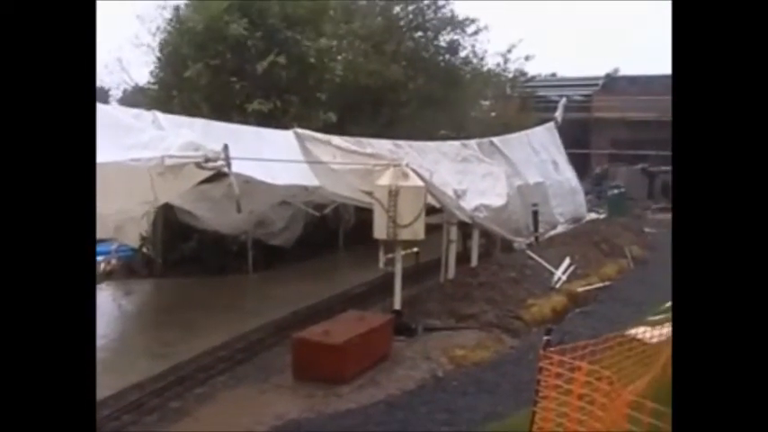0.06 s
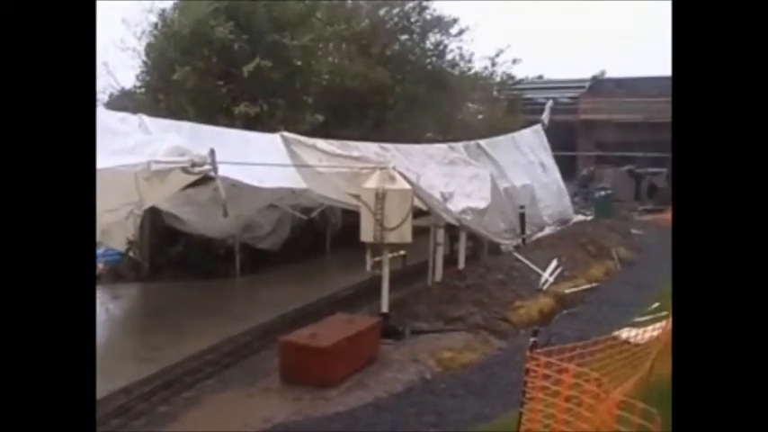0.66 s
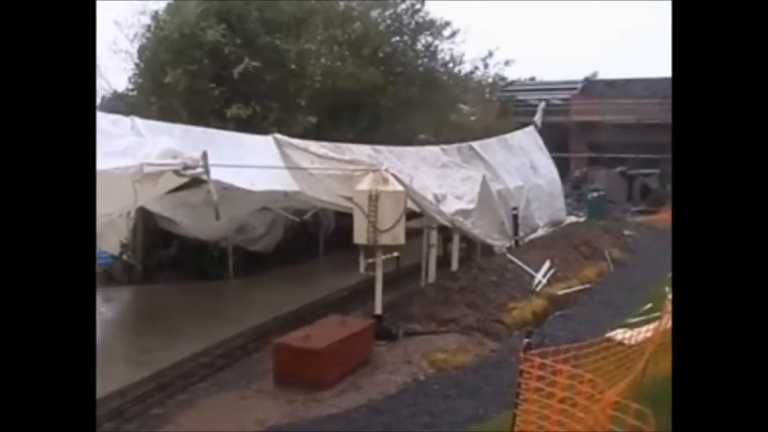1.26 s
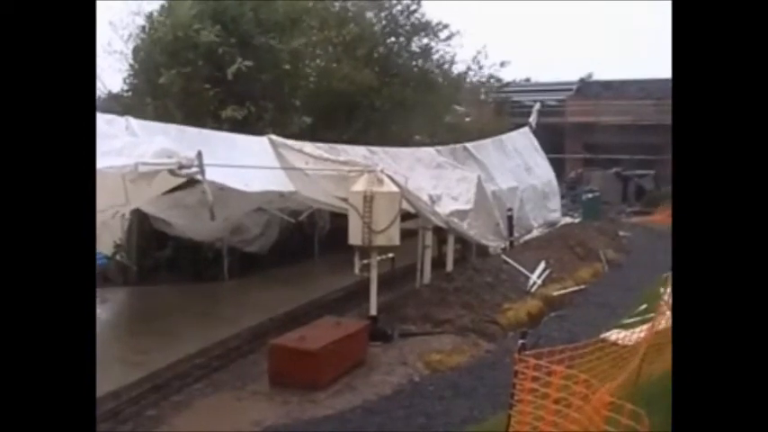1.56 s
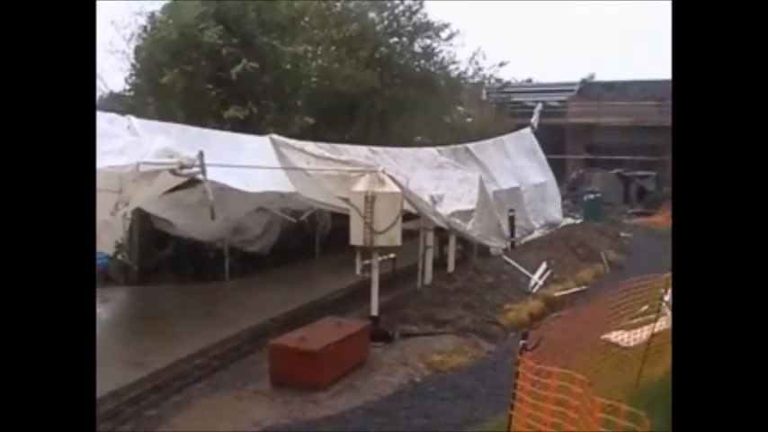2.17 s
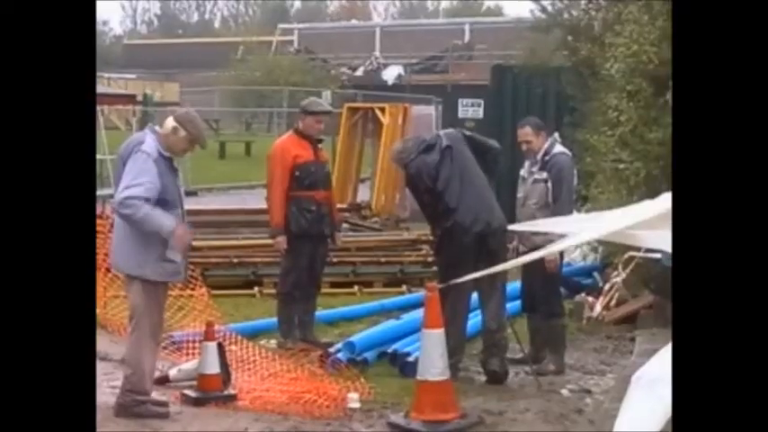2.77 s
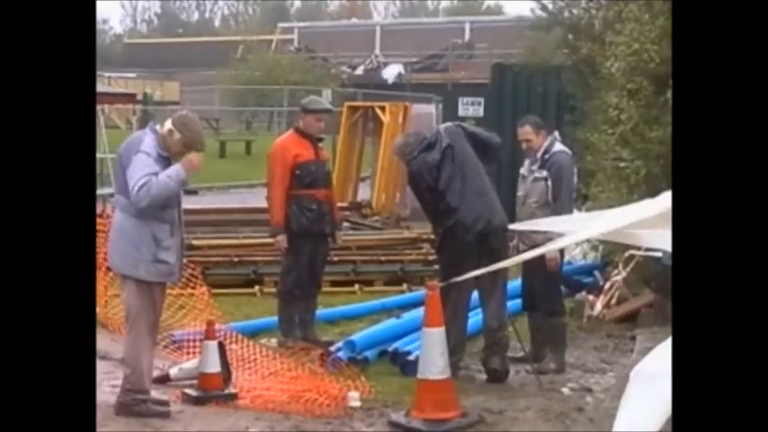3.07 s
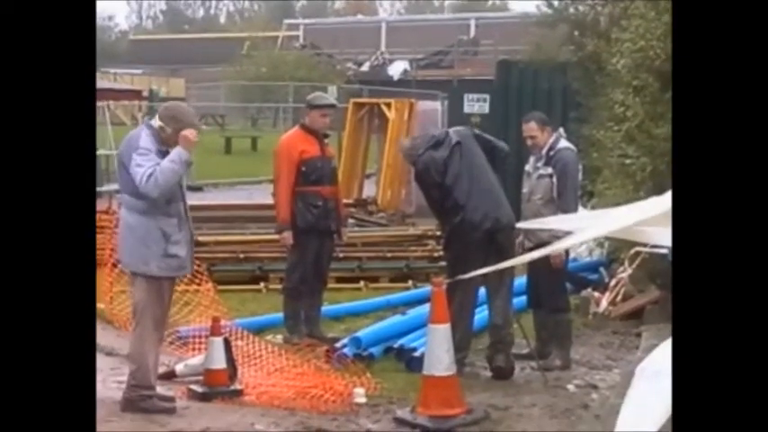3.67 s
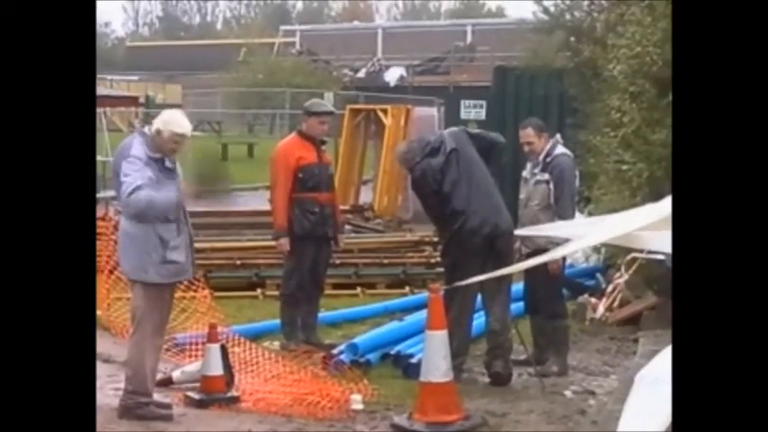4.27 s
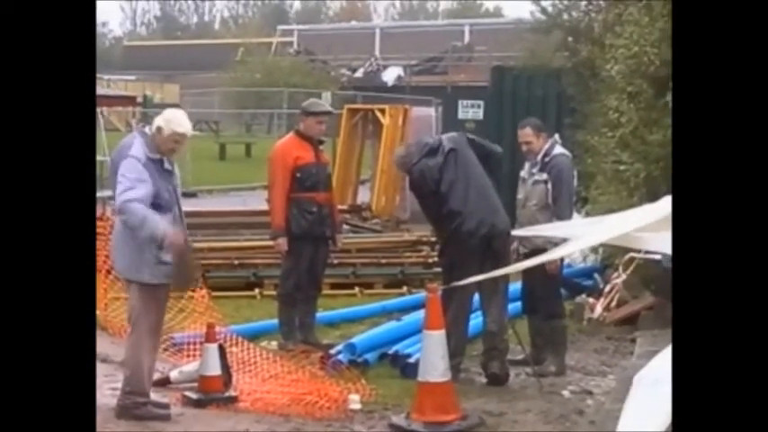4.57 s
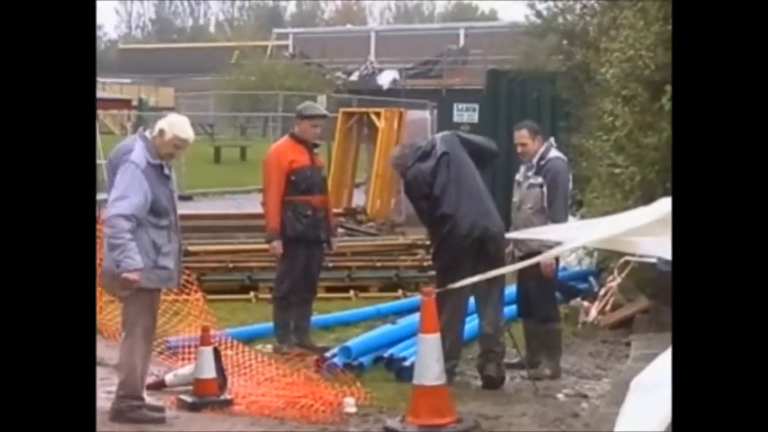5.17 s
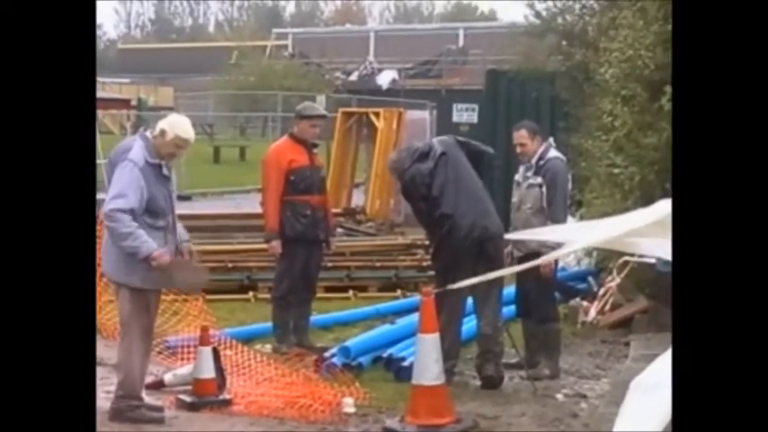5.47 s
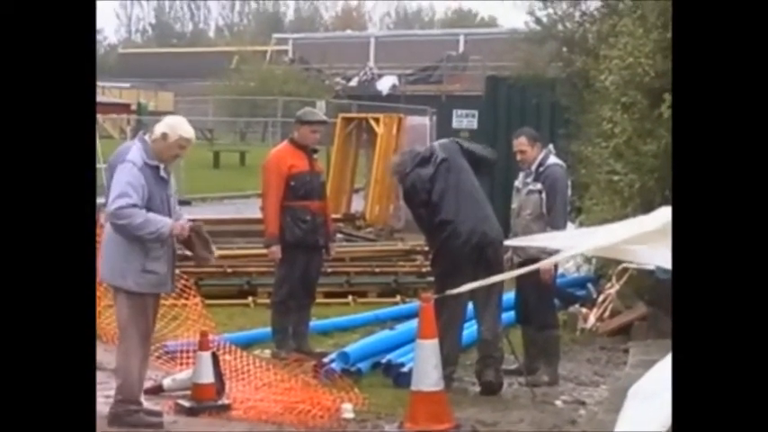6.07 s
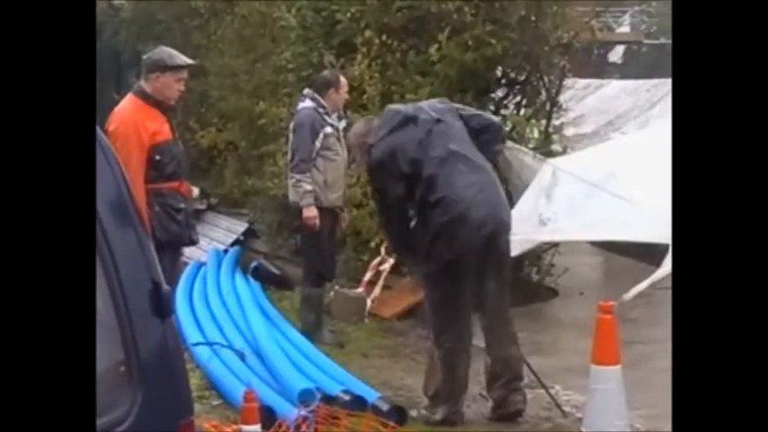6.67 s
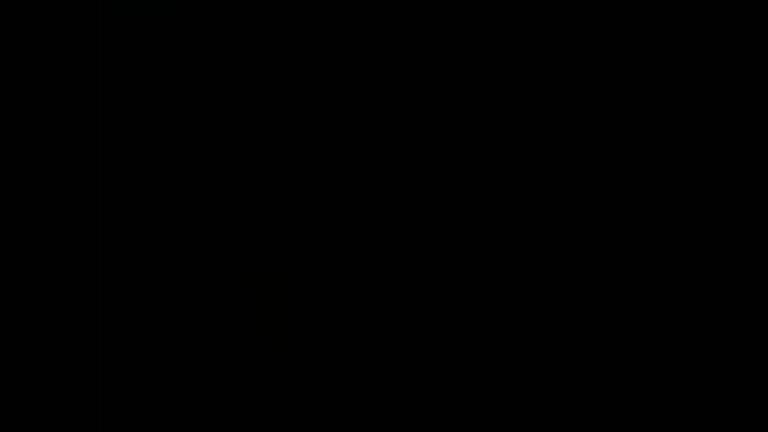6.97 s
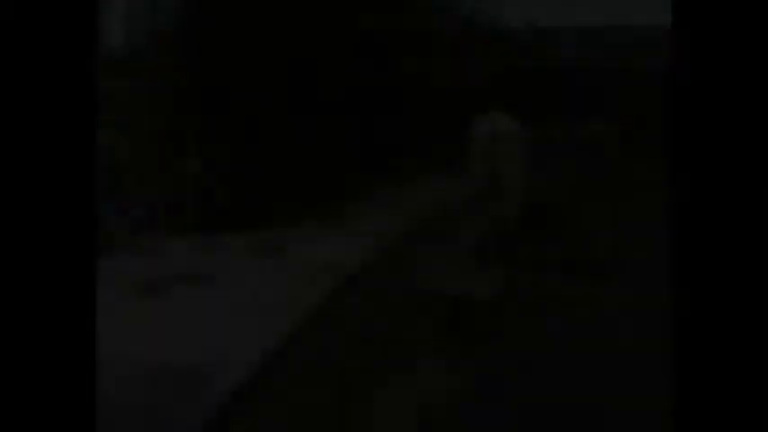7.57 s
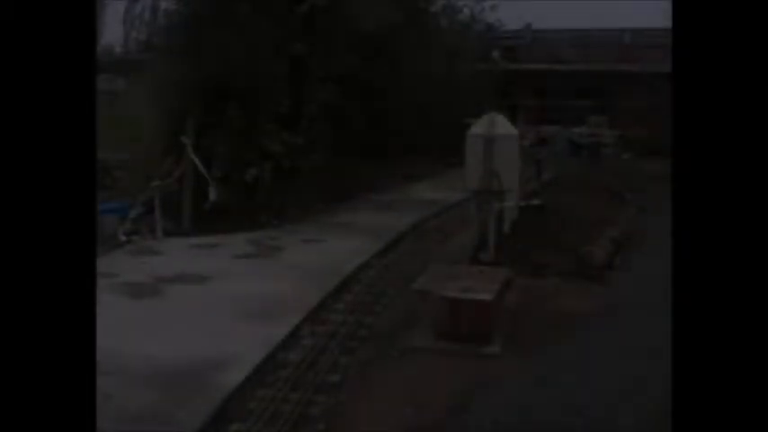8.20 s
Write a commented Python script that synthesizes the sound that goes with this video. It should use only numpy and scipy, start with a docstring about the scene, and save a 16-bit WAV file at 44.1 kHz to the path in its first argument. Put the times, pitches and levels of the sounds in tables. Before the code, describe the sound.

A hammer strikes a steel stake outdoors in steady, ringing clanks over a rush of wind and far traffic.

```python
"""Hammering a steel stake

Wind in trees and far traffic rush behind an idling engine. A cut leads into hammering on a building site: each
impact cracks, excites the modes of hammer and stake, which wet soil damps, and echoes off buildings, while the
camera's gain control ducks. Small knocks sound around the site, and one loud, bright echo follows the last
blow, heard from beside bushes. Then a quiet yard fades in, with a bird."""
import sys
import numpy as np
from scipy import signal
from scipy.fft import rfft, irfft, next_fast_len
from scipy.io import wavfile
from scipy.ndimage import uniform_filter1d, minimum_filter1d

SR = 44100
rng = np.random.default_rng(int(sys.argv[2]) if len(sys.argv) > 2 else 0)


def master(y):
    """Save y as 16-bit WAV."""
    cut = np.clip(np.atleast_2d(y).T, -1, 1)
    pcm = np.round(cut * 32767)  # scale
    wavfile.write(sys.argv[1], SR, pcm.astype(np.int16))


N = 372204
TIME = np.arange(N) / SR
WORK_START_S, BUSHES_START_S, YARD_START_S = 2.49, 6.132, 6.93


def from_db(db):
    """Decibels to amplitude ratio."""
    return 10 ** (np.asarray(db) / 20)


def rms_one(x):
    """Normalisation to rms 1."""
    return x / np.sqrt(np.mean(x ** 2) + 1e-20)


def butter(x, hz, kind):
    """Second-order Butterworth low- or high-pass."""
    return signal.sosfilt(signal.butter(2, hz, kind, fs=SR, output="sos"), x)


def noise(spectrum, size):
    """Spectral shaping of white noise by (frequency_hz, level_db) points; rms 1."""
    hz, db = np.transpose(spectrum)
    gain = from_db(np.interp(np.log(np.fft.rfftfreq(size, 1 / SR) + 1), np.log(hz), db))
    return rms_one(irfft(rfft(rng.standard_normal(size)) * gain, size))


def drift(rate_hz, t=TIME):
    """Random modulation with a spread of about 1."""
    return np.interp(t * rate_hz, np.arange(400), rng.standard_normal(400))


def decay(t, t60_s):
    """Exponential damping: 60 dB down at t60_s."""
    return np.exp(-np.log(1000) * t / t60_s)


def add(track, start_s, sound):
    """Superposition of a sound on the track."""
    start = round(start_s * SR)
    track[start:start + len(sound)] += sound[:N - start]


# Background spectrum at each listening place: frequency_hz, relative_density_db
TENT_SPECTRUM = [(15, -45), (25, -20), (39, -17), (70, -4), (145, -7), (229, -3), (293, -6), (591, -3),
                 (641, -2), (887, -5.5), (1370, -7), (2410, -14.5), (4490, -19.5), (12500, -33.5),
                 (16000, -45)]
WORK_SPECTRUM = [(15, -34.5), (25, -8.5), (249, -3), (384, -4.5), (489, -2), (591, -3.5), (677, 1),
                 (887, -2), (1330, -3.5), (2350, -12.5), (4490, -16), (8140, -28.5), (11000, -31.5),
                 (16000, -37)]
BUSHES_SPECTRUM = [(15, -58.5), (25, -18), (87, -1), (145, -10), (270, -7), (591, -9.5), (677, -4.5),
                   (1190, -8.5), (1330, -8), (2350, -17), (4610, -20.5), (14000, -38.5), (16000, -44)]
YARD_SPECTRUM = [(15, -46), (25, -14), (102, -4.5), (141, -11), (175, -6.5), (344, -10.5), (373, -7),
                 (607, -7), (936, -6.5), (2910, -24.5), (7310, -29), (16000, -43)]

def wind_and_traffic(tent_db=-35, work_db=-33, bushes_db=-31, dip_db=10, dip_s=0.12, fade_db_per_s=16.5):
    """Broadband noise of wind in trees and far traffic; each place has its own spectrum and level."""
    place = np.searchsorted([WORK_START_S, BUSHES_START_S, YARD_START_S], TIME)
    spectra = (TENT_SPECTRUM, WORK_SPECTRUM, BUSHES_SPECTRUM, YARD_SPECTRUM)
    rush = np.choose(place, [noise(spectrum, next_fast_len(N))[:N] for spectrum in spectra])
    dip = np.clip(1 - (TIME - WORK_START_S) / dip_s, 0, 1)
    yard_db = -73.5 + fade_db_per_s * (TIME - YARD_START_S)
    level_db = np.choose(place, [tent_db, work_db - dip_db * dip, bushes_db, yard_db])
    return butter(rush, 36, "high") * from_db(uniform_filter1d(level_db, size=300) + drift(6.8) / 2)


# Low orders of the idling engine: frequency_hz, rms_db
ENGINE_ORDERS = [(55, -53.5), (82.5, -50.5), (112, -57.5), (269.5, -60.5)]

def engine(speed_wander=0.016):
    """Engine orders share one shaft, so their frequencies waver together with its speed."""
    shaft_time = np.cumsum(1 + speed_wander * drift(6.28)) / SR
    hum = sum(from_db(db + 2 * drift(10.3)) * np.sqrt(2) * np.sin(2 * np.pi * hz * shaft_time)
              for hz, db in ENGINE_ORDERS)
    return hum * (TIME < WORK_START_S)


# Narrow hiss band of the camera's mechanism: frequency_hz, relative_density_db
HISS_SPECTRUM = [(3500, -33), (4300, -7.5), (4600, -3), (4900, -8), (6000, -24)]

def camera_noise(hiss_db=-52.5, line_db=-82.5, whine_db=-81.5):
    """Self-noise: hiss and a line-frequency whistle, which give way to a thin whine in the yard."""
    hiss = from_db(hiss_db) * noise(HISS_SPECTRUM, N)
    whistle = from_db(line_db) * np.sin(2 * np.pi * 15625 * TIME)
    whine = from_db(whine_db) * np.sin(2 * np.pi * 8000 * TIME)
    return np.where(TIME < YARD_START_S, hiss + whistle, whine)


def tilt_db(hz, hardness_db, reference_hz=11340):
    """Spectral tilt: a harder contact is shorter and puts more energy into high frequencies."""
    return hardness_db * hz / reference_hz


# Spectrum of the contact: frequency_hz, relative_density_db
CRACK_SPECTRUM = [(100, -22.5), (600, -5.5), (1000, -3.5), (2200, -4.5), (3500, 5.5), (5500, -3.5),
                  (9000, -1), (11500, -1.5), (12500, -4), (14500, -6), (15700, -29.5)]

def contact_crack(t, hardness_db, gain_db=-2, t60_s=0.03):
    """Impact transient: a noise burst, louder and brighter for a harder contact."""
    spectrum = [(hz, db + tilt_db(hz, hardness_db)) for hz, db in CRACK_SPECTRUM]
    return from_db(gain_db + hardness_db / 2) * noise(spectrum, len(t)) * decay(t, t60_s)


def ring(modes, t, hardness_db, rattle_rad=0):
    """Free vibration as a sum of damped modes; rattling modulates their phases."""
    out = 0
    for k, (hz, db, t60_s) in enumerate(modes):
        gain = (-1) ** k * from_db(db + tilt_db(hz, hardness_db) + rng.standard_normal() / 2)
        flutter = rattle_rad * drift(400, t)
        out = out + gain * np.sin(2 * np.pi * hz * t + flutter) * decay(t, t60_s)
    return out


# Modes of the stake: frequency_hz, relative_level_db, t60_s
STAKE_MODES = [(880, -10.5, .025), (963, -5, 0.021), (1616, -11.5, .06), (1876, -10.5, 0.052),
               (2270, -16.5, 0.023), (2570, -19, 0.044), (2890, -7, .024), (3050, -12.5, 0.042),
               (3390, -4.5, 0.053), (3502, -6, 0.08), (3664, -4, 0.051), (3860, -18, .025),
               (4420, -12, 0.051), (5124, -6.5, 0.039), (5350, -6.5, 0.055), (5550, -6.5, 0.046),
               (5695, -8, .025), (6560, -8.5, 0.021), (7030, -5.5, .045), (7180, -7, 0.03),
               (7530, -11, 0.041), (8960, -4, 0.019), (10030, -9.5, 0.031), (10590, -1.5, .03)]

def stake_clank(t, hardness_db, gain_db=-5.5):
    """Inharmonic modes of a rattling steel stake, quickly damped by the soil."""
    return from_db(gain_db) * ring(STAKE_MODES, t, hardness_db, rattle_rad=0.5)


# Modes of the hammer face: frequency_hz, relative_level_db, t60_s
FACE_MODES = [(11090, -2, .017), (11340, 0, .022), (11660, -1, .016)]

def hammer_ping(t, hardness_db, gain_db):
    """A small, stiff body has high natural frequencies: the hammer face pings briefly."""
    return from_db(gain_db) * ring(FACE_MODES, t, hardness_db)


def scatter(envelope):
    """Diffuse scattering: random paths under an envelope, with a flat spectrum and energy near 1."""
    size = len(envelope)
    spectrum = rfft(rng.standard_normal(size) * envelope, 2 * size)
    local_power = np.abs(uniform_filter1d(np.abs(spectrum) ** 2, size=110)) + 1e-20
    return irfft(spectrum / np.sqrt(local_power))[:size]


# Early reflections from pipes and fences: delay_s, relative_level_db
EARLY_REFLECTIONS = [(0.0127, -12), (.0185, -8.5), (.0255, -18.5)]
# Echoes from the buildings: delay_s, spread_s, relative_level_db
BUILDING_ECHOES = [(0.183, 0.0079, -21.5), (0.191, 0.0051, -14), (0.288, .006, -22.5)]

def site_response(t, echo_db, tail_db=-9, echo_hz=2950):
    """Impulse response: scatter from pipes and fences, a reverberant tail and band-limited echoes."""
    near = scatter(decay(t, t60_s=0.16) * np.clip(t / 0.011, 0, 1) ** 2)
    for delay_s, db in EARLY_REFLECTIONS:
        add(near, delay_s + 0.0002 * rng.standard_normal(), from_db([db]))
    tail = from_db(tail_db) * scatter(decay(t, t60_s=0.71) * np.clip(t / 0.035, 0, 1))
    reverberation = butter(butter(near, 9000, "low") + butter(tail, 7800, "low"), 1500, "high")
    echoes = sum(from_db(db + echo_db) * scatter(np.exp(-0.5 * ((t - delay_s) / spread_s) ** 2))
                 for delay_s, spread_s, db in BUILDING_ECHOES)
    return reverberation + signal.lfilter(*signal.iirpeak(echo_hz, Q=2.9, fs=SR), echoes)


# Blows on the stake: start_s, strength_db, hardness_db, ping_db
# Only the tail of the first is heard; the last is a rebound.
HAMMER_BLOWS = [(2.36, -2, -6, -1), (2.789, 1, 3, -0.5), (3.2228, 2, -5.5, 2.5), (3.6595, -0.5, 6.5, -2),
                (4.0726, 2.5, -4.5, 2), (4.5008, 1.5, 1, -0.5), (4.9262, -0.5, 4, -3), (5.3567, 2, 1, -1.5),
                (5.7858, 1.5, 3, -1.5), (6.2996, 1.5, 3.5, -5), (6.3247, -10.5, 5.5, -9.5)]

def hammering(rise_s=0.0009, ping_scatter_db=-6.5, bushes_echo_db=-9):
    """Impact excitation: each blow arrives directly and convolved with the site's response."""
    out, t = np.zeros(N), np.arange(3 * SR // 4) / SR
    onset = np.clip(t / rise_s, 0, 1)
    for start_s, strength_db, hardness_db, ping_db in HAMMER_BLOWS:
        clank = onset * (contact_crack(t, hardness_db) + stake_clank(t, hardness_db))
        ping = onset * hammer_ping(t, hardness_db, ping_db)
        response = site_response(t, bushes_echo_db * (start_s > BUSHES_START_S))  # echoes are weaker in this view
        radiated = clank + from_db(ping_scatter_db) * ping  # the ping is beamed, so less of it scatters
        reflected = signal.fftconvolve(radiated, response)[:len(t)]
        add(out, start_s, from_db(strength_db) * (clank + ping + reflected))
    return out * (TIME > WORK_START_S) * (TIME < YARD_START_S)


def resonate(pulse, hz, width_hz):
    """Response of a damped resonator, low-passed an octave above its centre; peak 1."""
    radius = np.exp(-np.pi * width_hz / SR)
    poles = [1, -2 * radius * np.cos(2 * np.pi * hz / SR), radius ** 2]
    out = butter(signal.lfilter([1, 0, -1], poles, pulse), 2 * hz, "low")
    return out / np.abs(out).max()


# Small knocks around the site, and one loud, bright echo of the last hammer blow: start_s, body_peak_db,
# centre_hz, bandwidth_hz, tick_peak_db
KNOCKS_AND_ECHO = [(4.2892, -3.5, 1010, 990, -19), (6.0197, -13.5, 1920, 400, -10.5),
                   (6.3327, 8.5, 3400, 129, -24.5), (6.677, -26, 2970, 2000, -18.5),
                   (7.226, -56, 190, 40, -90), (7.45, -55, 100, 25, -90)]

def knocks_and_echo(scatter_db=-26.5, scatter_t60_s=0.092):
    """Damped resonance: a pulse and its scatter excite a body resonance and a bright tick."""
    out, t = np.zeros(N), np.arange(SR // 4) / SR
    for start_s, body_db, centre_hz, width_hz, tick_db in KNOCKS_AND_ECHO:
        pulse = (t == 0) + from_db(scatter_db) * rng.standard_normal(len(t)) * decay(t, scatter_t60_s) / 2
        body = from_db(body_db) * resonate(pulse, centre_hz, width_hz)
        tick = from_db(tick_db) * resonate(pulse, hz=6100, width_hz=9000)
        add(out, start_s, body + tick)
    return out


# Calls of a far bird: start_s, length_s, start_hz, end_hz, peak_db
BIRD_CHIRPS = [(7.96, 0.082, 6270, 6100, -78), (8.21, 0.1, 6240, 7300, -66), (8.295, .07, 7450, 7550, -64)]

def bird():
    """Linear frequency sweeps: thin whistles that swell and fade."""
    out = np.zeros(N)
    for start_s, length_s, start_hz, end_hz, peak_db in BIRD_CHIRPS:
        pitch_hz = np.linspace(start_hz, end_hz, int(length_s * SR))
        whistle = np.sin(2 * np.pi * np.cumsum(pitch_hz) / SR)
        add(out, start_s, from_db(peak_db) * np.hanning(len(whistle)) * whistle)
    return out


def cut_gaps(gap_s=0.0042):
    """Gating: the sound drops out for an instant just as the scene changes to each new view of the work."""
    gates = [1 - np.exp(-((TIME - cut_s + gap_s / 2) / gap_s) ** 4)
             for cut_s in (WORK_START_S, BUSHES_START_S)]
    return np.prod(gates, axis=0)


def scene():
    """Superposition of all sources at one microphone, wired to the right channel."""
    mix = wind_and_traffic() + engine() + camera_noise() + hammering() + knocks_and_echo() + bird()
    return np.array([np.zeros(N), cut_gaps() * mix])


def gain_control(x, threshold_db=-9, attack_s=0.0012, hold_s=0.091, release_db_per_s=61.5):
    """Limiting: sound above the threshold pulls the gain down; it holds, then creeps back."""
    level_db = 10 * np.log10(np.abs(uniform_filter1d(x ** 2, size=64)) + 1e-12)
    excess_db = np.maximum(level_db - threshold_db, 0)
    half_hold = int(hold_s * SR) // 2
    held_db = -minimum_filter1d(-excess_db, 2 * half_hold + 1, origin=half_hold)
    duck_db = np.maximum.accumulate(held_db + release_db_per_s * TIME) - release_db_per_s * TIME
    pole = np.exp(-1 / (attack_s * SR))
    return x * from_db(-signal.lfilter([1 - pole], [1, -pole], duck_db))


def motor_notches(x, motor_hz=300, depth=0.5, memory=0.71):
    """Comb filtering: the camera subtracts what repeats with its motor, notching each harmonic."""
    delay = np.zeros(SR // motor_hz - 1)
    repeating = signal.lfilter(np.r_[0, delay, 1 - memory], np.r_[1, delay, -memory], x)
    return x - depth * repeating


def record(dry, leak_db=-33, treble_leak_db=-30.5, floor_db=-87, floor_hz=500, cutoff_hz=15700):
    """Limiting, notches and overload on the right; inverted crosstalk on the left; noise in both."""
    right = np.clip(motor_notches(gain_control(dry[1])), -1, 1)
    left = -from_db(leak_db) * right - from_db(treble_leak_db) * np.diff(right, prepend=0)
    pole = np.exp(-2 * np.pi * floor_hz / SR)
    circuit_noise = rms_one(signal.lfilter([1], [1, -pole], rng.standard_normal((2, N))))
    low_pass = signal.ellip(10, 0.1, 80, cutoff_hz, fs=SR, output="sos")
    return signal.sosfilt(low_pass, np.array([left, right]) + from_db(floor_db) * circuit_noise)


dry = scene()
out = record(dry)
master(out)
```